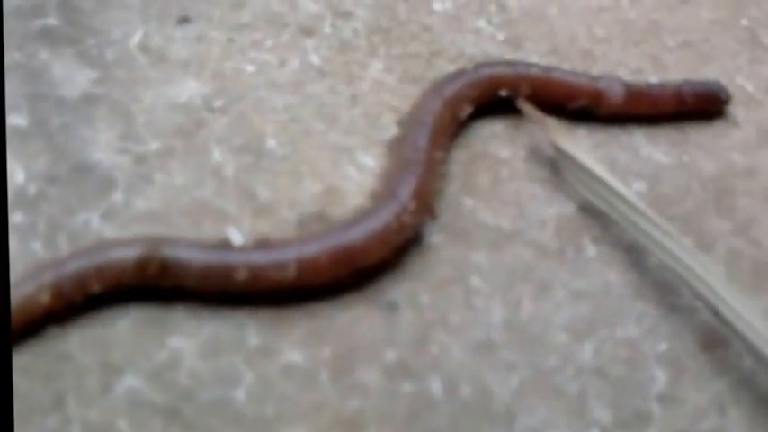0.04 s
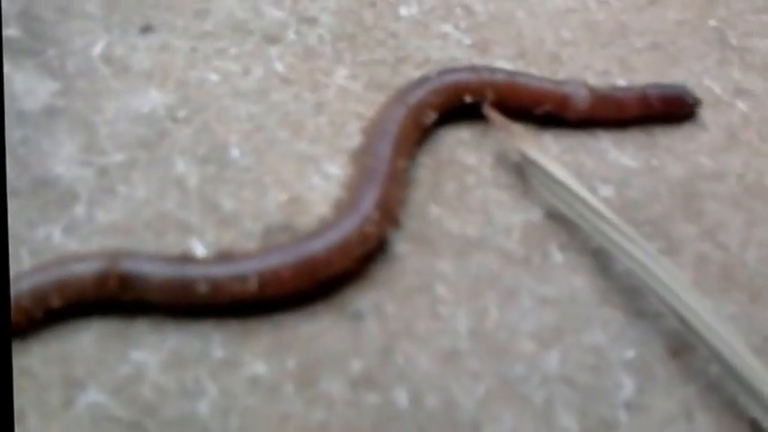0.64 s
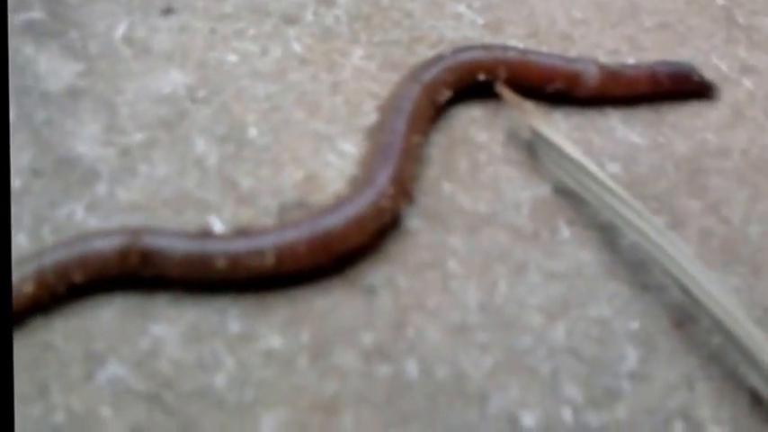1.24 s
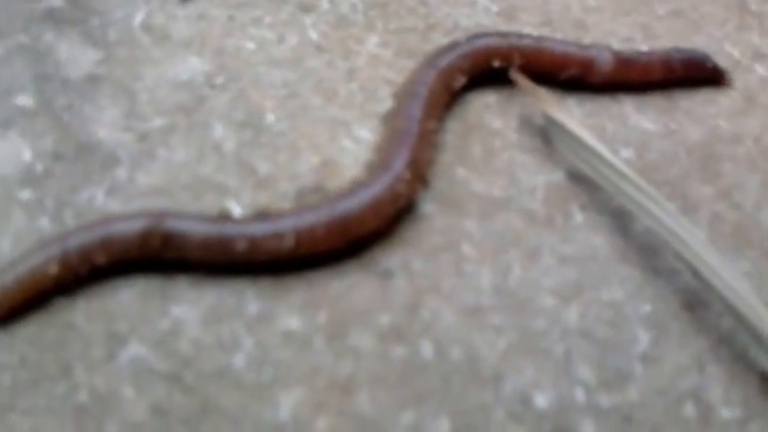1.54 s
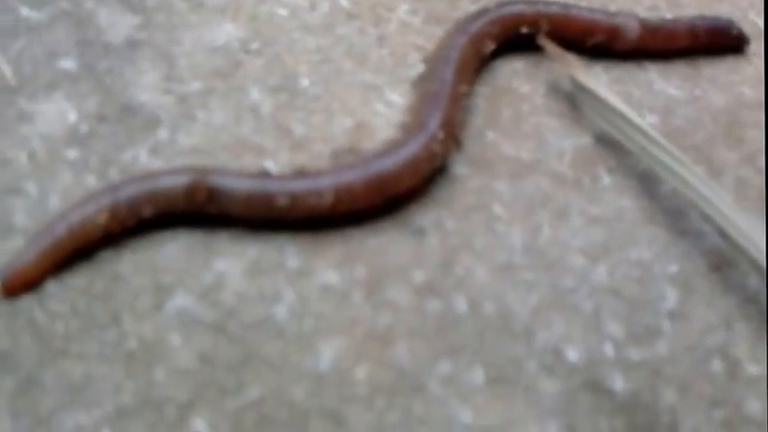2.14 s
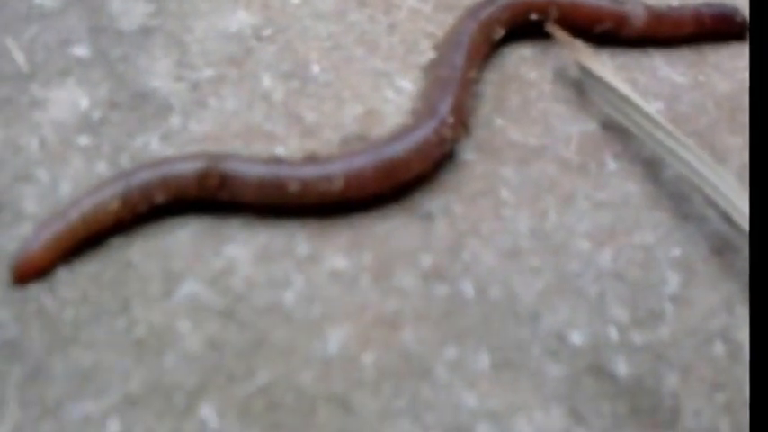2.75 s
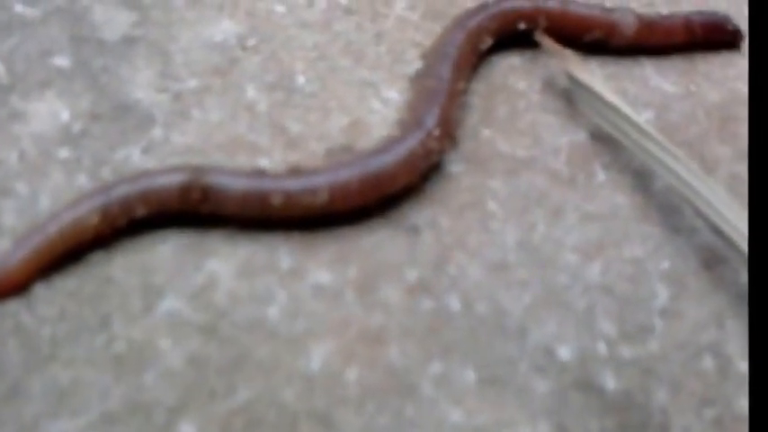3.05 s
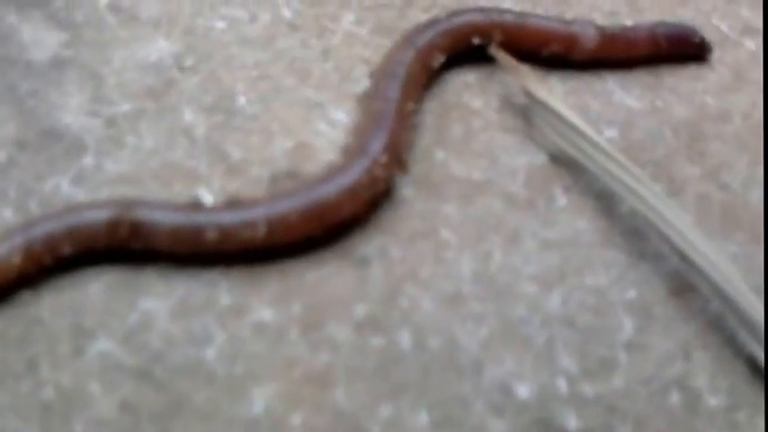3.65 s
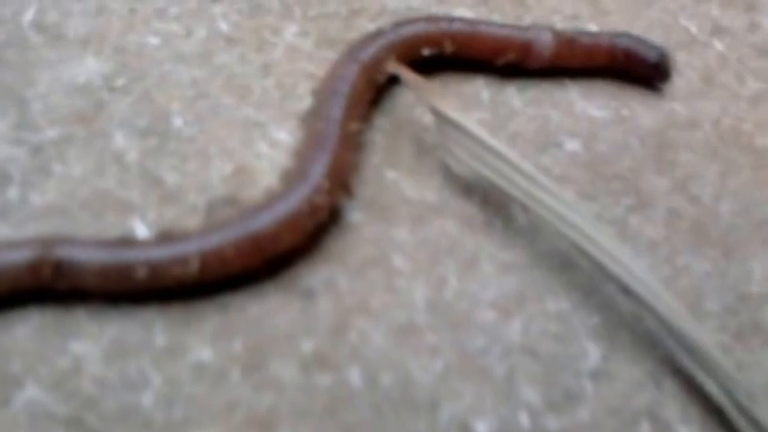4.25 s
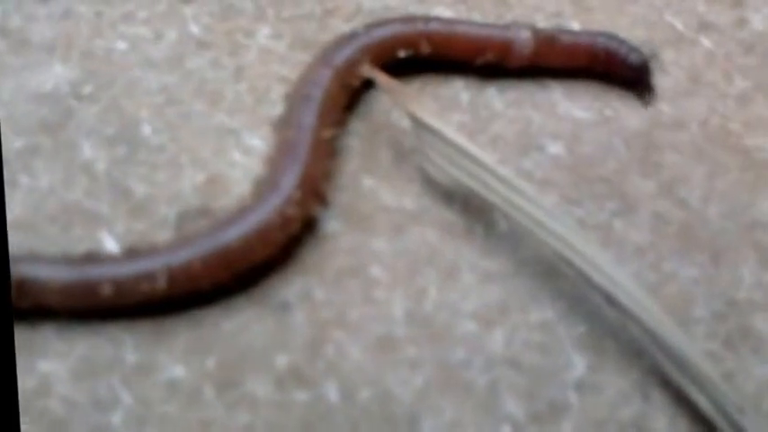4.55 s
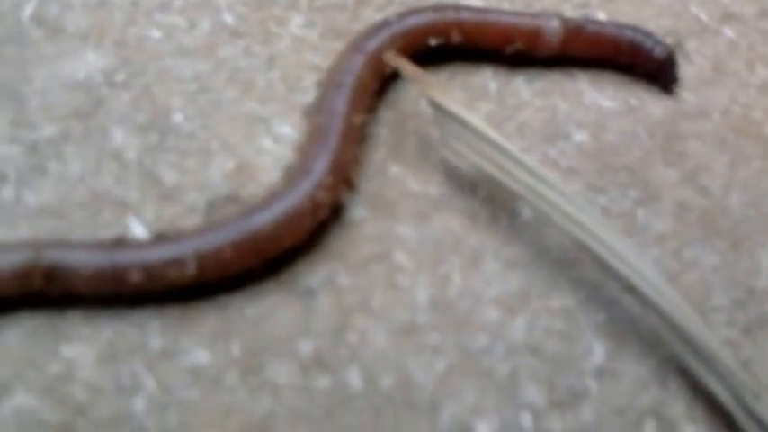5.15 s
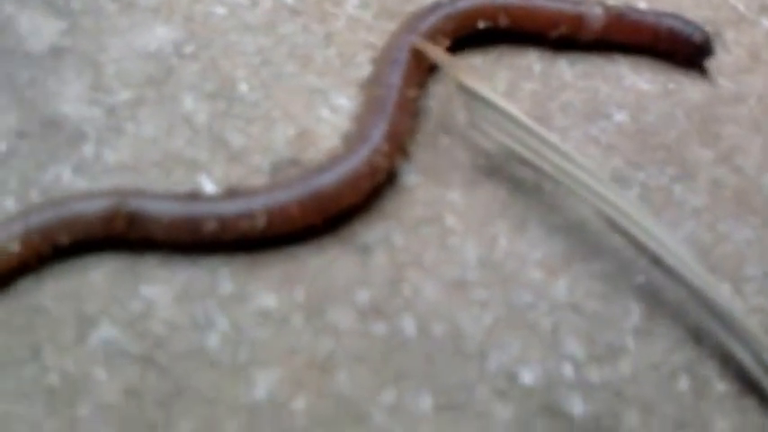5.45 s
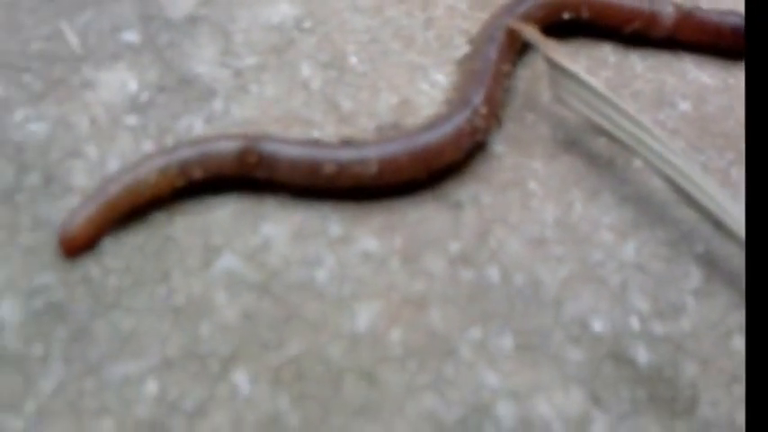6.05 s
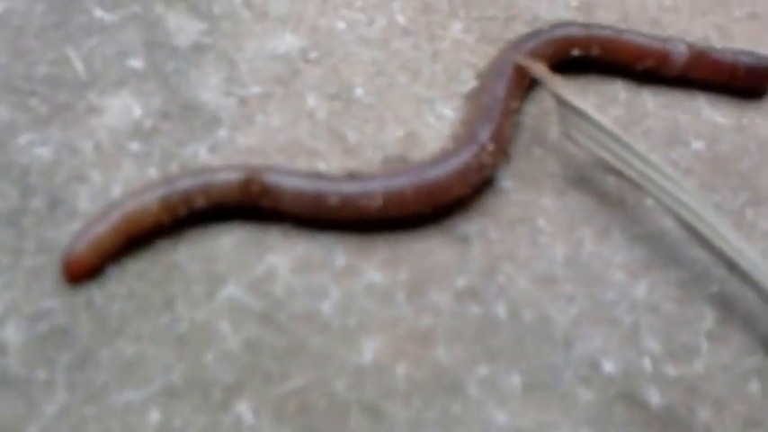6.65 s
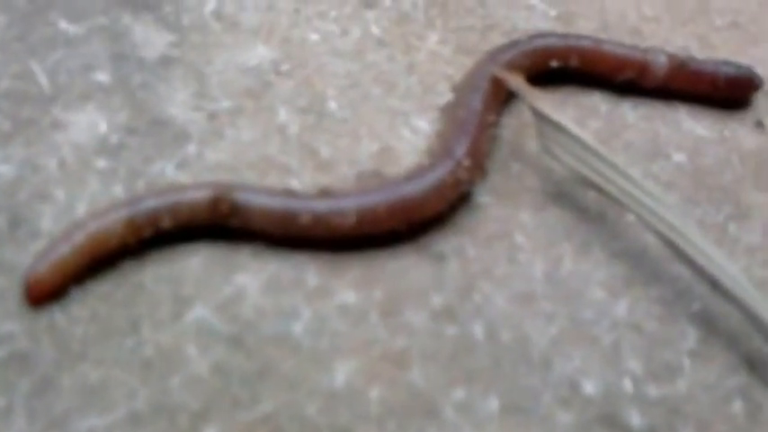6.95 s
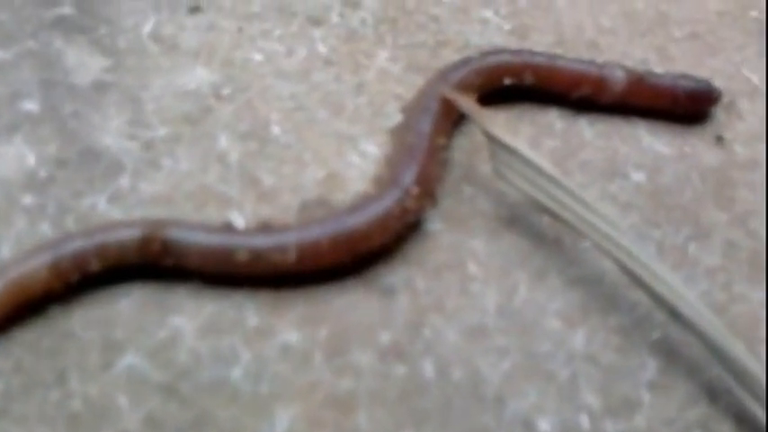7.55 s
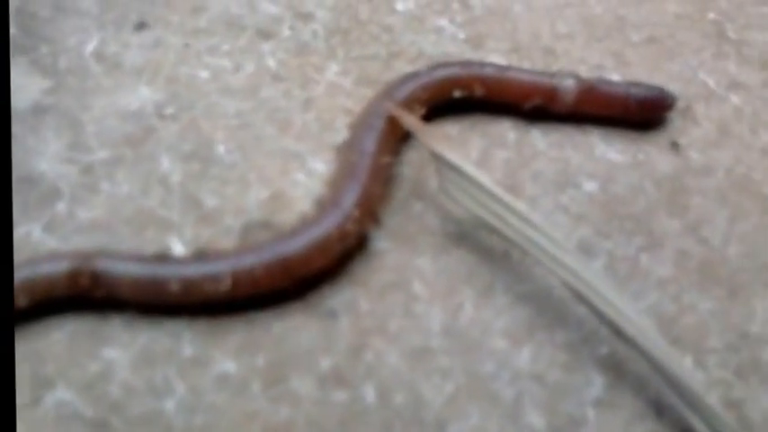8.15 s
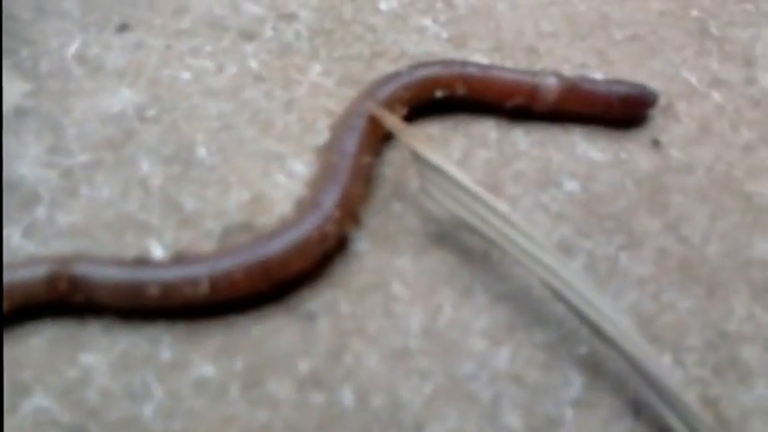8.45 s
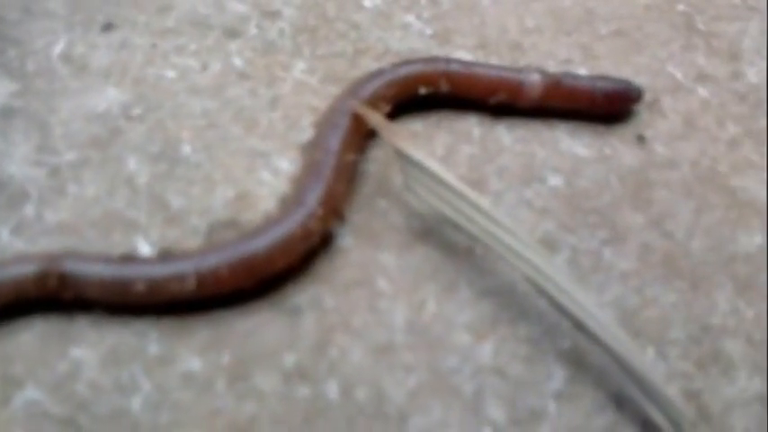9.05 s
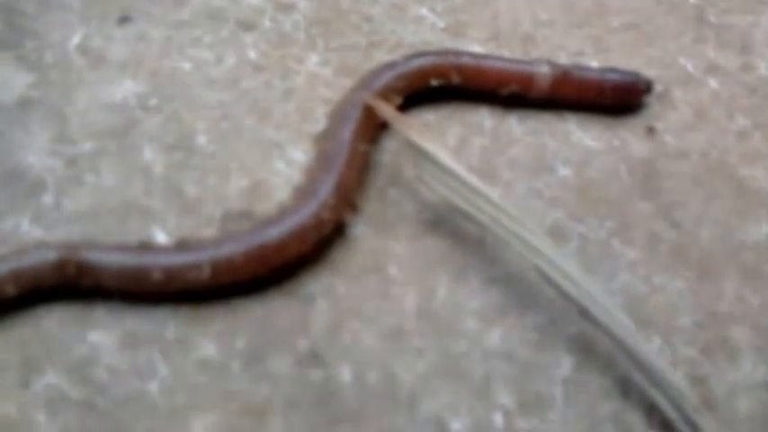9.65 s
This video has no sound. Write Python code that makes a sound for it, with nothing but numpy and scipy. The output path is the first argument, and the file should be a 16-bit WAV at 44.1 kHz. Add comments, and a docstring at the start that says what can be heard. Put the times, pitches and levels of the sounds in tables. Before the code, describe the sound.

In a quiet paved yard, low wind thumps against a microphone held near the ground, along with a few dry ticks and scuffs. As it eases, distant birds twitter faintly, and a closer bird gives two quick rising chirps. The gusts return, then die away. Two more chirps and some thin, high falling notes follow, over a soft hiss and distant outdoor hum.

```python
"""A quiet paved yard, heard low over the stones. First, turbulent wind buffets the microphone while dry
ticks and scuffs echo off the walls. As it drops, far birds twitter; near 4 s a close bird whistles two
rising chirps, and the gusts return, hardest at about 5.6 s. Faint whines enter after 6.5 s; from 8 s
come two more chirps, then thin falling chips. A distant murmur and microphone hiss lie under it all."""
import sys
import numpy as np
from scipy import signal
from scipy.fft import rfft, irfft
from scipy.io import wavfile
from scipy.ndimage import map_coordinates

SR = 44100
rng = np.random.default_rng(int(sys.argv[2]) if len(sys.argv) > 2 else 0)


def file_out(sig):
    """Save sig as 16-bit WAV at sys.argv[1]."""
    # one column per channel
    cols = np.atleast_2d(sig).T
    # limit, then scale
    lim = np.clip(cols, -1, 1)
    pcm = np.round(lim * 32767).astype(np.int16)
    wavfile.write(sys.argv[1], SR, pcm)


N = 432180
TIME = np.arange(N) / SR

# Turbulence at the reference wind level. Each row: frequency in Hz, relative spectral level in dB.
TURBULENCE_SPECTRUM = [(10, -37), (25, 2.5), (50, 9), (110, 4.5), (200, -7), (350, -21), (600, -49.5),
                       (1000, -34.5), (2000, -67)]
# The breeze between gusts. Each row: time in seconds, level in dB.
BREEZE_LEVELS = [(0, -41), (.3, -41), (.6, -38.5), (.9, -36), (1.05, -50), (1.7, -59), (2.15, -56),
                 (2.75, -63), (3.1, -52), (3.5, -59), (4.05, -58), (4.6, -45.5), (5.05, -45.5), (5.3, -54),
                 (6.15, -41.5), (6.55, -49), (7.25, -53), (7.65, -65)]
# Gusts on top of the breeze. Each row: time of the peak in seconds, level in dB, half length in seconds.
GUST_PEAKS = [(0.232, -25.5, .02), (0.389, -33, .035), (0.492, -25.5, 0.0293), (.6, -29, 0.024),
              (0.72, -33, 0.02195), (1.233, -39.5, .06), (1.546, -46, 0.027), (2.288, -48, 0.03),
              (2.886, -51.5, 0.021), (3.039, -50, 0.0304), (3.246, -43, 0.036), (3.77, -52, 0.023),
              (3.981, -50, 0.024), (4.186, -34, .03), (4.31, -27, 0.028), (4.555, -37, .02),
              (4.643, -29.5, 0.018), (4.749, -30, .035), (4.911, -38, .018), (4.999, -39.5, .02),
              (5.175, -32.5, .018), (5.348, -44.5, 0.024), (5.56, -25, 0.018), (5.712, -38, 0.026),
              (5.87, -38, 0.053), (6.411, -44.5, 0.0208), (6.66, -44, .018), (6.787, -47, .02),
              (7.127, -47.5, .018), (7.365, -50, 0.017)]
# The hardest single eddies. Each row: time in seconds, peak level in dB, pitch in Hz.
HARD_EDDIES = [(.2192, -16.5, 247), (.228, -19, 183), (.3831, -19.5, 136), (.412, -25.5, 230),
               (.466, -23, 300), (.4871, -14.5, 248), (.492, -21, 289), (.504, -14, 200), (.574, -27, 298),
               (.605, -22, 184), (.719, -22.5, 120), (.807, -17.5, 212.4), (.832, -26.5, 248),
               (1.202, -33.5, 230), (3.24, -35, 156.5), (4.282, -23, 161), (4.296, -24.5, 339.6),
               (4.303, -20, 276), (4.311, -18, 250), (4.318, -22, 255), (4.330, -16.5, 139),
               (4.638, -21, 130.1), (4.645, -24, 160.4), (4.748, -20.5, 238.4), (4.907, -29.5, 143.6),
               (5.174, -20.5, 175), (5.183, -18.5, 100.2), (5.555, -8, 130.1), (5.571, -13, 330),
               (5.588, -22.5, 189)]
# A near bird's chirps. Each row: start in seconds, length in seconds, starting pitch in Hz, pitch before
# the final flick in Hz, level before the resonances in dB, growth in dB, tilt in dB per harmonic.
RISING_CHIRPS = [(3.618, 0.034, 2360, 3130, -47.5, 2.5, 1), (4.062, 0.041, 2526, 3842, -40.5, 9, -2),
                 (8.0666, 0.042, 2480, 3250, -34, -1, 1), (8.443, 0.028, 2600, 3080, -51, 12, -4.5)]
# Resonances that colour the chirps. Each row: frequency in Hz, gain in dB.
CHIRP_RESONANCES = [(2450, -15), (3000, -10), (3450, -1.5), (4100, -5), (5100, 3.5), (5600, -7.5),
                    (6400, -8.5), (7300, -5), (8000, -29.5), (8900, -15), (10300, -33), (11700, -19),
                    (13000, -30)]
# Chips a little further off. Each row: start in seconds, starting pitch in Hz, level in dB.
FALLING_CHIPS = [(8.658, 8230, -50.5), (9.07, 6500, -52), (9.085, 5000, -54), (9.419, 8000, -48),
                 (9.768, 6870, -49)]
# Dry ticks. Each row: start in seconds, level in dB, centre in Hz, bandwidth in Hz, decay in seconds.
DRY_TICKS = [(.192, -39, 3330, 2000, 0.0054), (.206, -39, 3700, 2390, .006),
             (.221, -50, 3900, 2400, 0.0035), (.240, -36.5, 3200, 1810, 0.006),
             (2.797, -57, 2700, 700, .005), (3.29, -50.5, 3600, 1980, .007),
             (3.757, -54.5, 800, 1100, 0.0056), (4.9741, -37.5, 2780, 1409, 0.0033),
             (4.982, -51, 3300, 1101, 0.019), (5.622, -51.5, 3288, 2505, 0.0076),
             (7.254, -52.5, 4460, 7060, 0.0061), (7.324, -57.5, 2000, 495, 0.0063)]
# Longer scuffs. Each row: start in seconds, level in dB, centre in Hz, bandwidth in Hz, decay in seconds.
DRY_SCUFFS = [(.204, -56, 3000, 10000, 0.054), (.438, -55, 850, 1090, .04),
              (0.647, -46.5, 1860, 4730, 0.055), (.672, -52, 5000, 1000, 0.047),
              (3.016, -46.5, 683, 790, 0.015), (3.022, -52, 2200, 2400, .012),
              (5.844, -49.5, 3320, 4930, 0.018)]
# Far birds. Each row: start in seconds, central pitch in Hz, level in dB.
FAR_TWITTERS = [(1.08, 5530, -61), (1.28, 4830, -55.5), (1.97, 4970, -53.5), (2.49, 4940, -56),
                (2.99, 4950, -54.5), (3.05, 6010, -64), (3.11, 4685, -63), (4.27, 5080, -59.5),
                (5.62, 5400, -60), (9.0, 8000, -61.5), (9.28, 5040, -56), (9.64, 5140, -54)]
# Distant outdoor murmur. Each row: frequency in Hz, relative spectral level in dB.
MURMUR_SPECTRUM = [(15, -6), (40, 5.5), (80, -1), (160, -1.5), (300, -3.5), (500, -6), (800, -8),
                   (1200, -13), (1700, -17), (2500, -55), (4400, -56)]
# Microphone hiss. Each row: frequency in Hz, relative spectral level in dB.
HISS_SPECTRUM = [(1000, -13.5), (1900, -2.5), (2700, 0.5), (3500, 2), (4150, -3), (5200, 2.5), (6200, -6),
                 (7300, -2.5), (8400, -9.5), (9300, -5), (10400, -10.5), (11500, -4.5), (12500, -12.5)]
# Thin far-off whines. Each row: start, end and fade in seconds, pitch and bandwidth in Hz, level in dB.
FAR_WHINES = [(6.5, 10.4, 0.9, 1607, 28.5, -77.5), (8.3, 9.12, 0.13, 1615, 20, -76),
              (9.22, 10.5, 0.13, 2300, 200, -69)]


def wind(mean_db, reference_db=-33, ceiling_db=-32, calm_db=-59, speed_exponent=.3, flutter=.17):
    """Frozen turbulence: a fixed pattern blows past the microphone, so stronger wind is also quicker."""
    # above the ceiling the flow breaks up into single hard eddies instead
    db = np.minimum(mean_db, ceiling_db) + 2.2 * wander(70)
    speed = amp(speed_exponent * (db - reference_db)) * np.exp(flutter * wander(120))
    position = np.cumsum(speed) % (N - 1)
    pressure = map_coordinates(coloured_noise(TURBULENCE_SPECTRUM), [position], order=1)
    stirred = 1 / (1 + amp(calm_db - mean_db) ** 4)  # near calm, the air slides past smoothly
    return pressure * stirred * amp(db)


def wind_level():
    """Incoherent sources add in power: breeze and gusts sum to one mean level in dB."""
    breeze_power = amp(np.interp(TIME, *np.transpose(BREEZE_LEVELS))) ** 2
    gust_power = sum(amp(db) ** 2 * swell(s, half_s) for s, db, half_s in GUST_PEAKS)
    return 10 * np.log10(breeze_power + gust_power)


def eddies(rows, steepness=.56):
    """A passing vortex puts one pressure pulse on the diaphragm, with suction before and after."""
    out, t = np.zeros(N), np.arange(-SR // 40, SR // 40) / SR
    for s, db, hz in rows:
        bump = 1 / np.cosh(2 * np.pi * hz * steepness * t)
        add(out, max(s + t[0], 0), amp(db) * bump * (2 * bump ** 2 - 1))
    return out


def shed_eddies(mean_db, max_per_s=45, onset_db=-35, scatter_db=3.5, onset_hz=230):
    """Vortex shedding: stronger wind gives more, harder, shorter eddies, in rows like HARD_EDDIES."""
    step = 256  # samples between chances to shed
    slots = np.arange(0, N, step)
    chance = rng.random(len(slots))
    strength, pitch = rng.standard_normal((len(slots), 2)).T
    db = mean_db[slots]
    shed = chance < max_per_s * step / SR / (1 + amp(onset_db - db) ** 4)
    peak_db = np.minimum(db - 1.8, -27) + scatter_db * strength
    hz = onset_hz * amp(.19 * (db - onset_db)) * np.exp(.3 * pitch)
    return np.column_stack([slots / SR, peak_db, hz])[shed]


def chirps(bend=1.45, flick_rise=.26, flick_share=.046):
    """Source and filter: each harmonic of a rising whistle brightens as it crosses a resonance."""
    out = np.zeros(N)
    for s, length_s, start_hz, end_hz, db, growth_db, tilt_db in RISING_CHIRPS:
        u = progress(length_s)
        glide_hz = start_hz + (end_hz - start_hz) * u ** bend
        hz = glide_hz * (1 + flick_rise * np.exp((u - 1) / flick_share))  # a last upward flick
        for k in range(1, 5):
            resonance_db = np.interp(k * hz, *np.transpose(CHIRP_RESONANCES))
            gain = amp(db + growth_db * u + tilt_db * (k - 1.5) + resonance_db)
            add(out, s, gain * whistle(hz, waver=.023, harmonic=k))
    return out


def chips(length_s=.034, drop=.28):
    """A fast downward frequency sweep of a single partial is heard as a bird's thin chip."""
    out, u = np.zeros(N), progress(length_s)
    for s, hz, db in FALLING_CHIPS:
        add(out, s, amp(db) * whistle(hz * (1 - drop * u ** 1.1), waver=.022))
    return out


def whistle(hz, waver, harmonic=1, rasp_db=2.5, knots_per_s=350):
    """Random frequency and amplitude modulation roughen one harmonic of a bird's note."""
    position = TIME[:len(hz)] * knots_per_s
    wobble, rasp = (np.interp(position, np.arange(128), knots) for knots in rng.standard_normal((2, 128)))
    phase = 2 * np.pi * np.cumsum(hz * (1 + waver * wobble)) / SR
    u = np.linspace(0, 1, len(hz))
    envelope = np.abs(np.sin(np.pi * u ** 1.22)) ** .5  # crests just past the middle
    return envelope * amp(rasp_db * rasp) * np.sin(harmonic * phase)


def ticks_and_scuffs(tick_rise_s=.0018, scuff_rise_share=.18):
    """Attack time sets hardness: ticks start sharply, scuffs more softly the longer they last."""
    out = np.zeros(N)
    for s, db, hz, width_hz, decay_s in DRY_TICKS:
        add(out, s, amp(db) * contact(hz, width_hz, tick_rise_s, decay_s))
    for s, db, hz, width_hz, decay_s in DRY_SCUFFS:
        add(out, s, amp(db) * contact(hz, width_hz, scuff_rise_share * decay_s, decay_s))
    return out


def contact(hz, width_hz, rise_s, decay_s):
    """A contact excites one broad, damped resonance: a band of noise that decays exponentially."""
    t = np.arange(SR // 4) / SR
    envelope = np.minimum(t / rise_s, 1) * np.exp(-np.maximum(t - rise_s, 0) / decay_s)
    return band_noise(hz, width_hz, len(t)) * envelope


def twitters(length_s=.1, note_s=.0193, notes=6, scatter=.0424, slide=.08, fall=.016):
    """Far birds' short glides, scattered about a sinking pitch, follow so fast that they fuse."""
    out, u = np.zeros(N), progress(note_s)
    for s, centre_hz, db in FAR_TWITTERS:
        for k, (offset, slope) in enumerate(rng.standard_normal((notes, 2))):
            hz = centre_hz * (1 + scatter * offset + slide * slope * (u - .5) - fall * (k / notes - .5))
            add(out, s + length_s * k / notes, amp(db) * whistle(hz, waver=.0286))
    return out


def yard_echo(x, t60_s, delay_s):
    """Reverberation: paving and walls scatter sound into grainy, exponentially decaying reflections."""
    t = np.arange(SR // 2) / SR
    reflections = rng.standard_normal(len(t)) ** 3  # cubing lets a few stand out
    onset = np.clip(t / delay_s - 1, 0, 1)
    response = reflections * onset * np.exp(-np.log(1000) * t / t60_s)
    return signal.fftconvolve(x, response / np.linalg.norm(response))[:N]


def noise_floor(murmur_db=-57.5, hiss_db=-58.5, lull_db=-2.16):
    """Broadband noise: distant murmur and the microphone's self-noise waver and briefly sink together."""
    murmur = coloured_noise(MURMUR_SPECTRUM) * amp(murmur_db + .45 * wander(4.1))
    hiss = coloured_noise(HISS_SPECTRUM) * amp(hiss_db + .25 * wander(13))
    return (murmur + hiss) * amp(lull_db * swell(peak_s=2, half_s=1))


def whines():
    """Narrowband noise is heard as a pitch: faint far-off whines that enter gradually."""
    out = np.zeros(N)
    for start_s, end_s, fade_s, hz, width_hz, db in FAR_WHINES:
        fade = np.clip(np.minimum(TIME - start_s, end_s - TIME) / fade_s, 0, 1)
        out += amp(db) * band_noise(hz, width_hz, N) * fade
    return out


def coloured_noise(spectrum):
    """Spectral shaping: white noise takes on a curve of (Hz, dB) points, at unit rms."""
    hz, db = np.transpose(spectrum)
    f = np.maximum(np.fft.rfftfreq(N, 1 / SR), 1)
    gain = amp(np.interp(np.log(f), np.log(hz), db))
    return unit_rms(irfft(rfft(rng.standard_normal(N)) * gain, N))


def band_noise(hz, width_hz, size):
    """Band-pass filtering confines white noise between steep sides, at unit rms."""
    f = np.maximum(np.fft.rfftfreq(size, 1 / SR), 1)
    detuning = (f * f - hz * hz) / (f * width_hz)
    return unit_rms(irfft(rfft(rng.standard_normal(size)) / np.sqrt(1 + detuning ** 6), size))


def wander(knots_per_s):
    """Interpolation between random values gives a slow fluctuation of unit rms."""
    knots = rng.standard_normal(N // 100)
    return unit_rms(np.interp(TIME * knots_per_s, np.arange(len(knots)), knots))


def swell(peak_s, half_s):
    """A bell curve: 1 at the peak, 1/e at half_s to either side."""
    return np.exp(-np.minimum(((TIME - peak_s) / half_s) ** 2, 50))


def progress(length_s):
    """Normalised time, 0 to 1 over a note."""
    return np.linspace(0, 1, int(length_s * SR))


def amp(db):
    """Amplitude grows tenfold every 20 dB."""
    return 10 ** (np.asarray(db) / 20)


def unit_rms(x):
    """Normalisation to a mean power of 1."""
    return x / np.sqrt(np.mean(x ** 2))


def add(out, s, x):
    """Superposition: x adds to out from s seconds on."""
    i = int(s * SR)
    out[i:i + len(x)] += x[:max(N - i, 0)]


def scene():
    """Direct and reflected sound add: wind is all direct, near sources are both, far birds all echo."""
    wind_db = wind_level()
    buffeting = wind(wind_db) + eddies(HARD_EDDIES) + eddies(shed_eddies(wind_db))
    rising, falling, contacts = chirps(), chips(), ticks_and_scuffs()
    direct = amp(-1) * rising + amp(-7) * falling + contacts
    to_walls = amp(-3) * (rising + falling) + amp(-7) * contacts
    near_echo = yard_echo(to_walls, t60_s=.29, delay_s=.0033)
    far_birds = yard_echo(twitters(), t60_s=.5, delay_s=.0019)
    return (buffeting + direct + near_echo + far_birds + noise_floor() + whines())[None]


def record(dry, dc_offset=-.0019, cutoff_hz=12250):
    """Band limiting: the converter sits slightly off zero and cuts the top treble steeply."""
    low_pass = signal.ellip(8, .2, 70, cutoff_hz, fs=SR, output="sos")
    return signal.sosfilt(low_pass, dry + dc_offset)


dry = scene()
out = record(dry)
file_out(out)
```